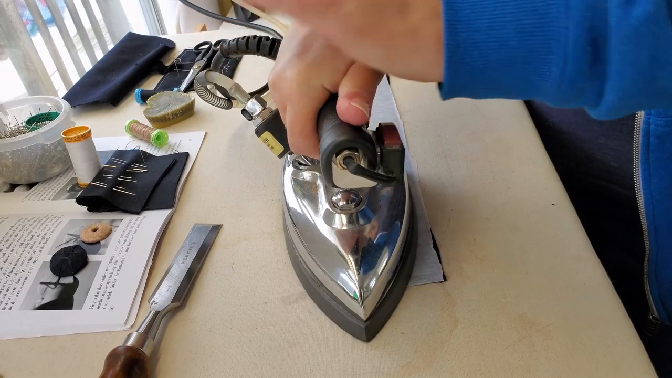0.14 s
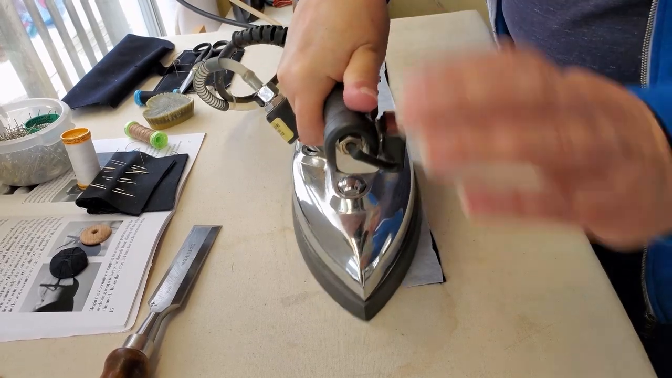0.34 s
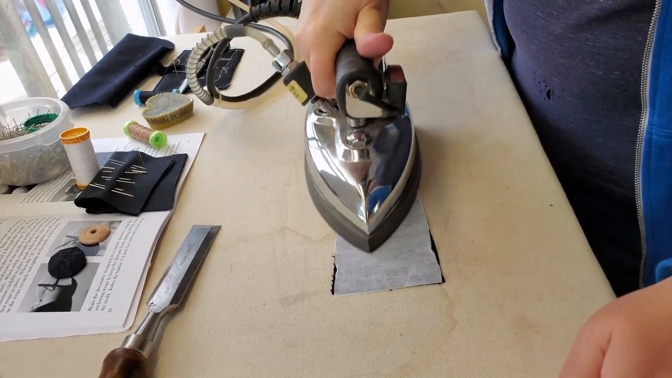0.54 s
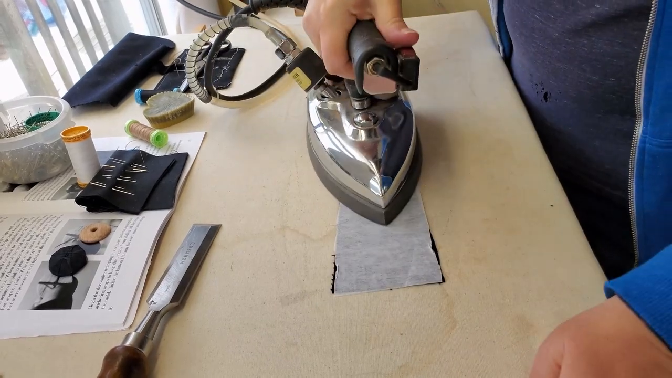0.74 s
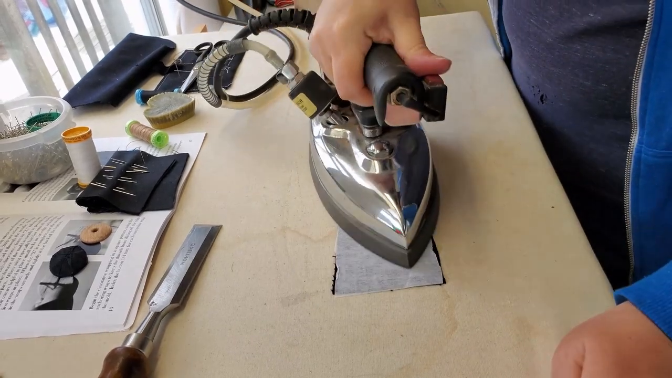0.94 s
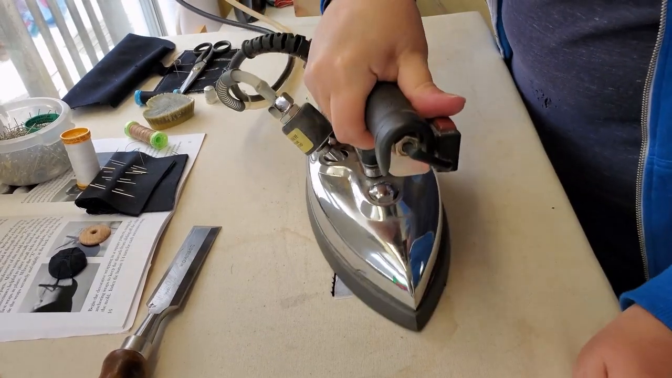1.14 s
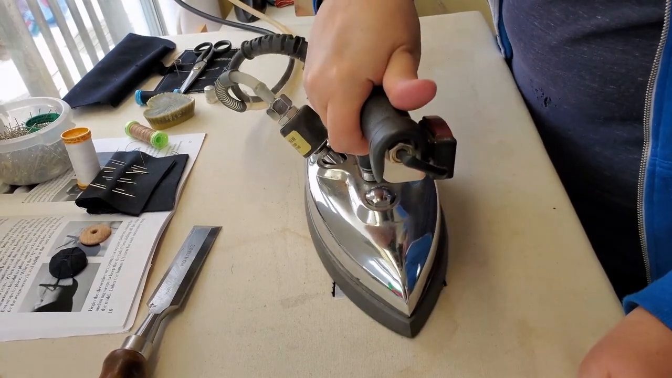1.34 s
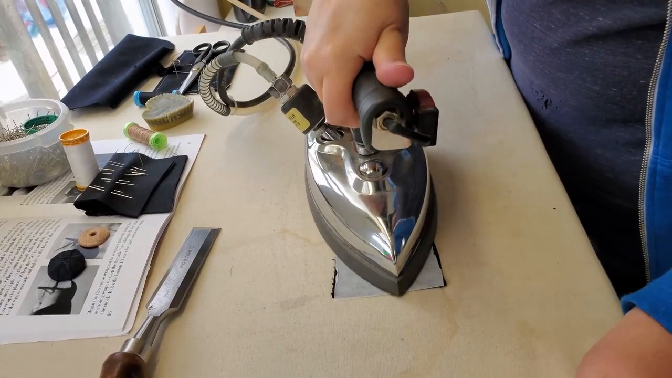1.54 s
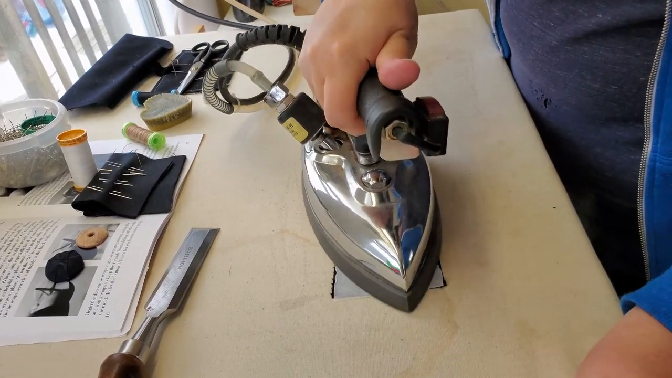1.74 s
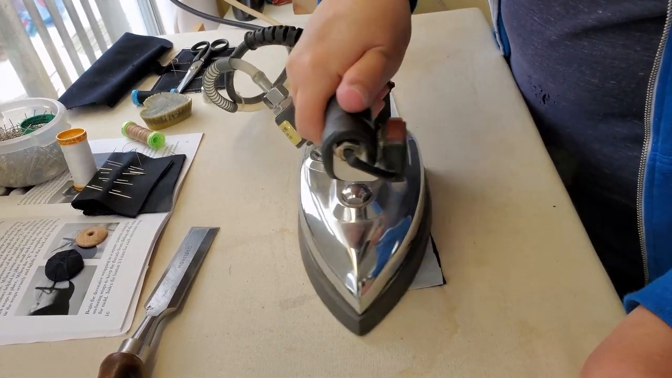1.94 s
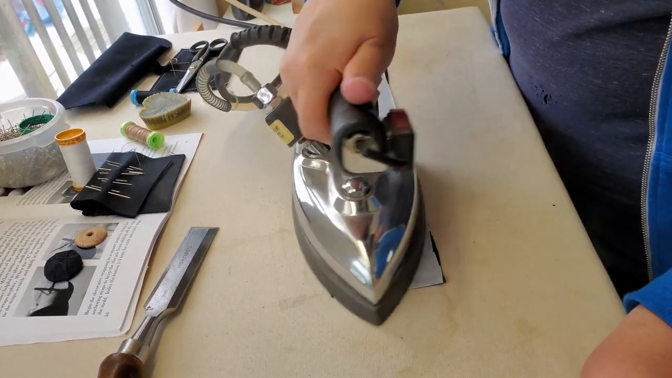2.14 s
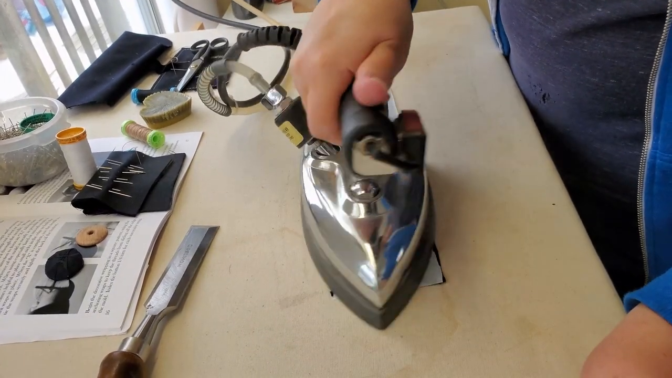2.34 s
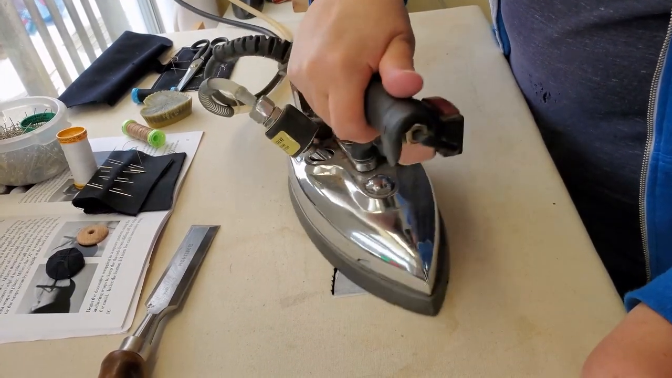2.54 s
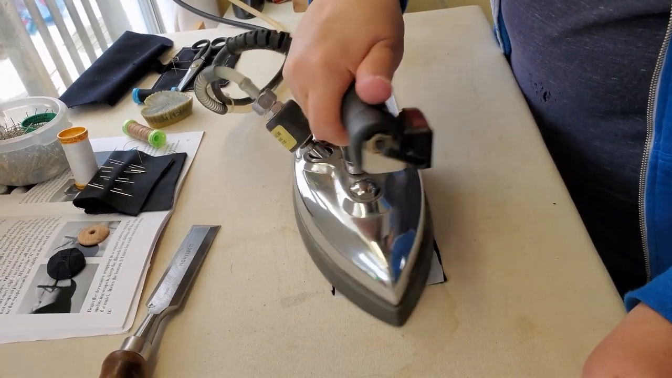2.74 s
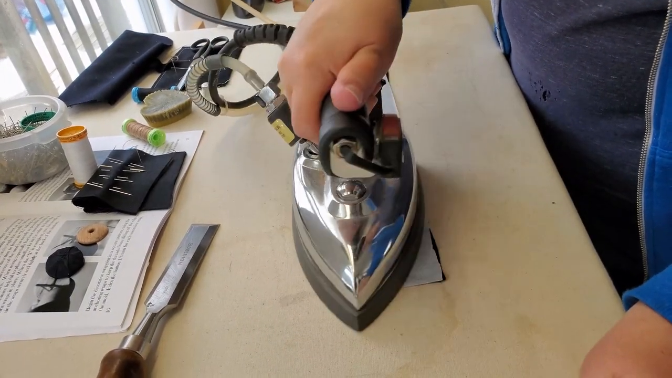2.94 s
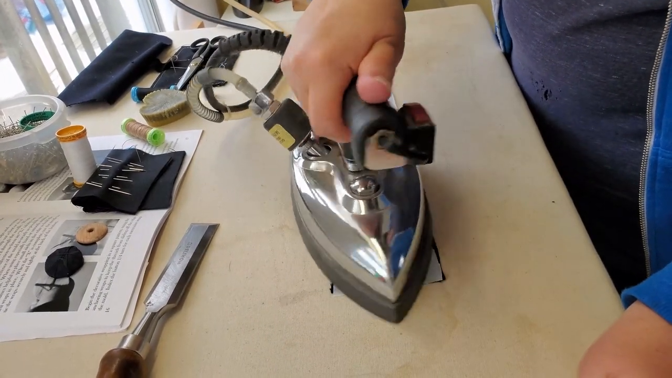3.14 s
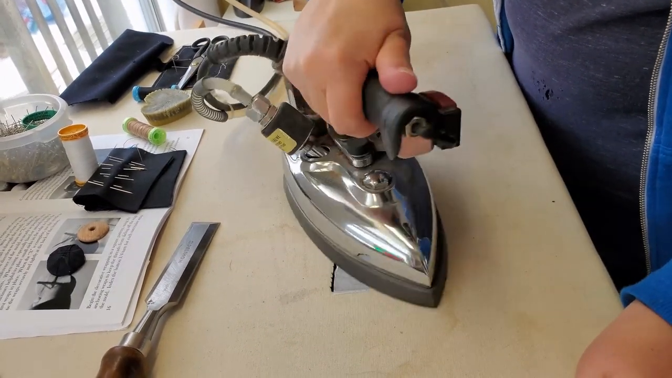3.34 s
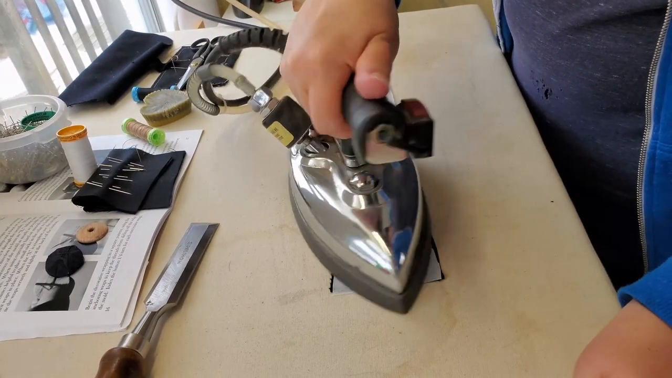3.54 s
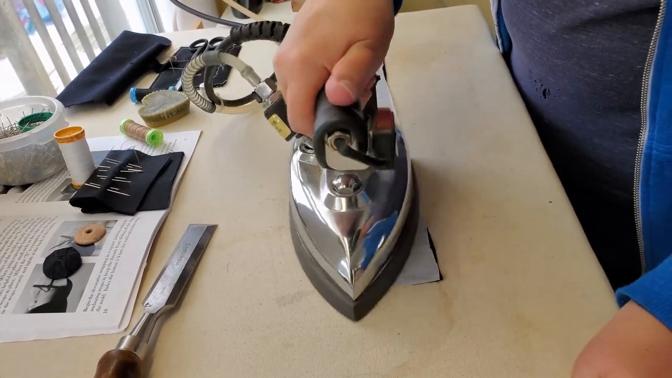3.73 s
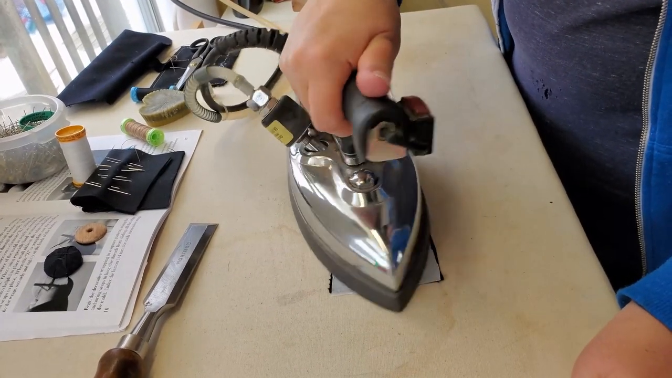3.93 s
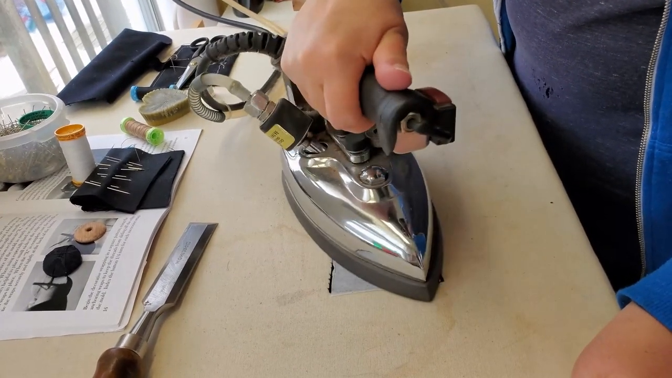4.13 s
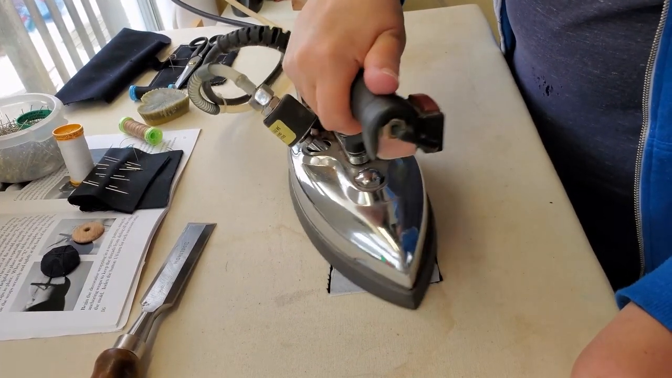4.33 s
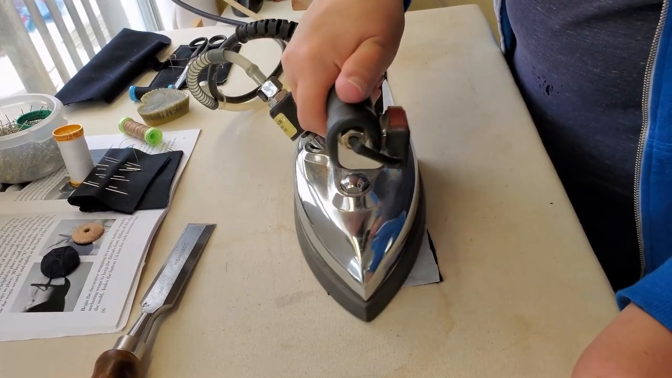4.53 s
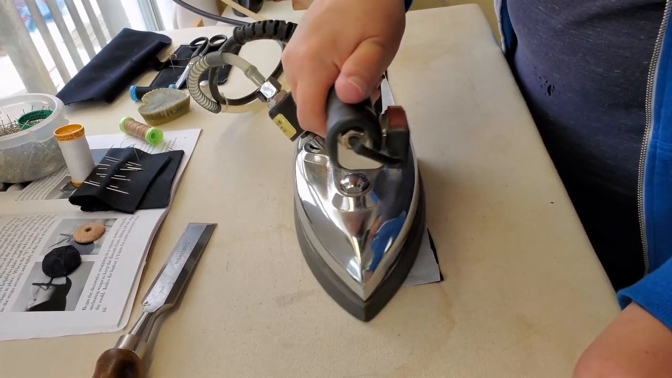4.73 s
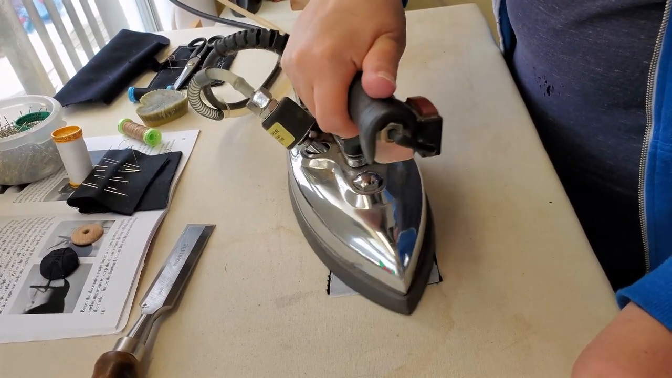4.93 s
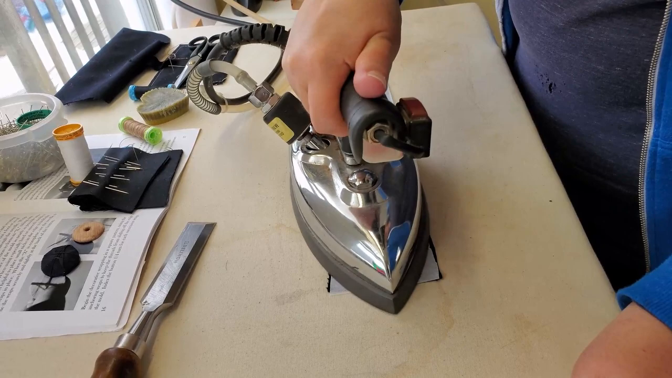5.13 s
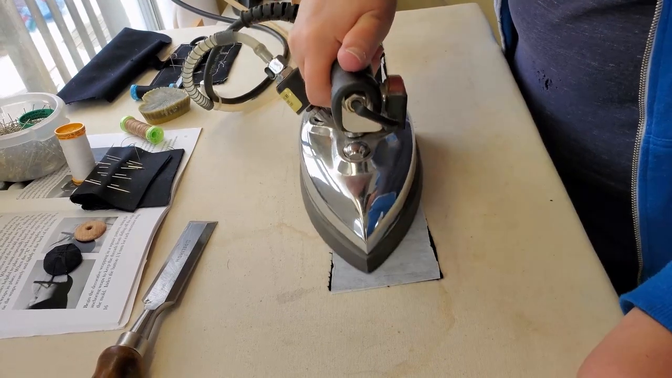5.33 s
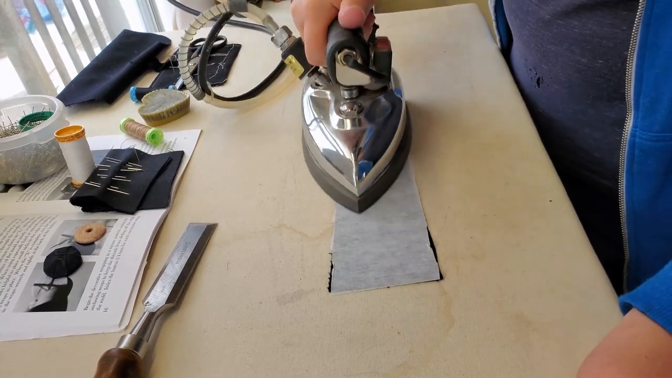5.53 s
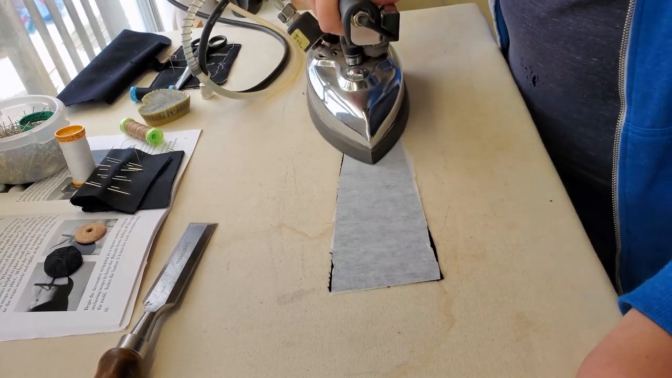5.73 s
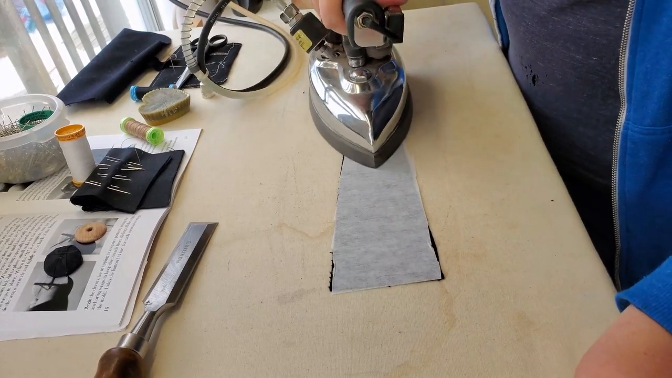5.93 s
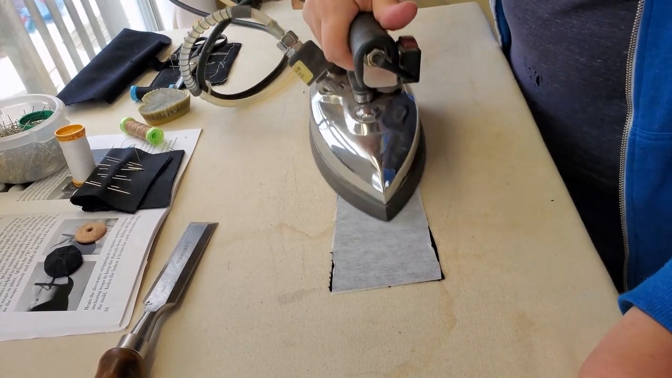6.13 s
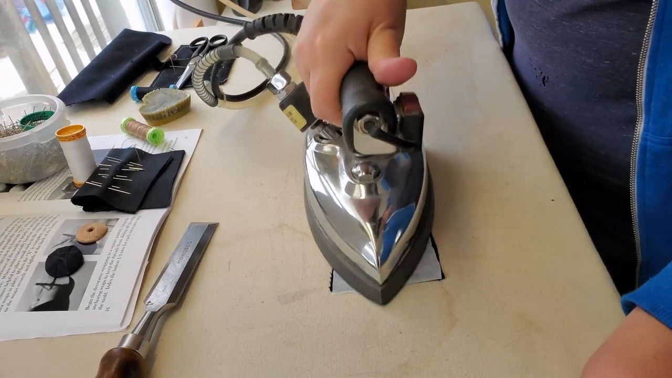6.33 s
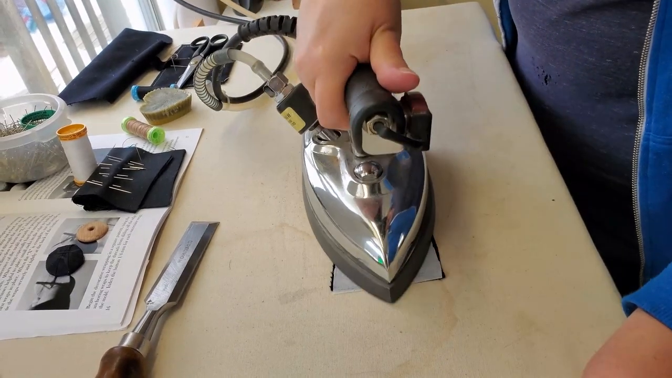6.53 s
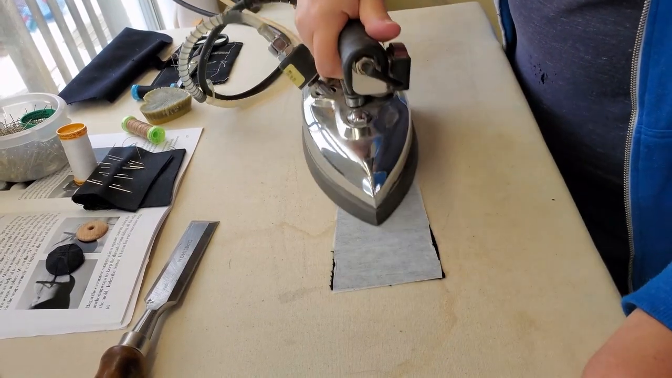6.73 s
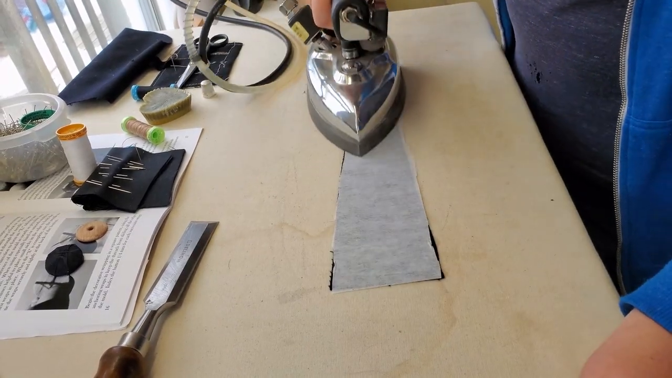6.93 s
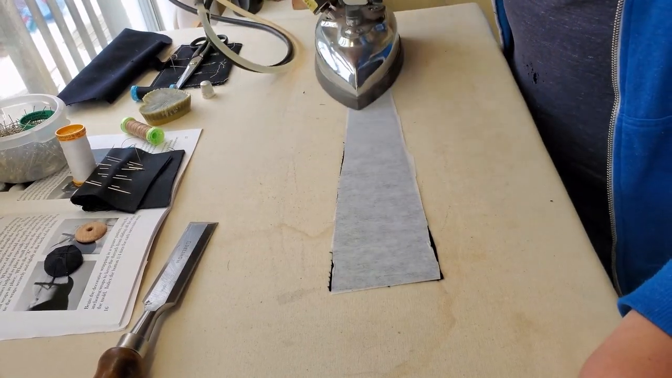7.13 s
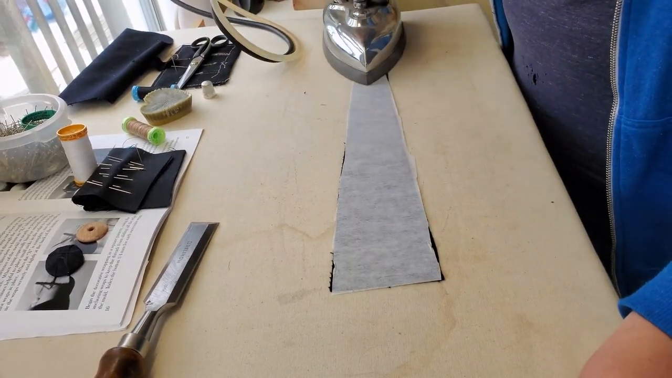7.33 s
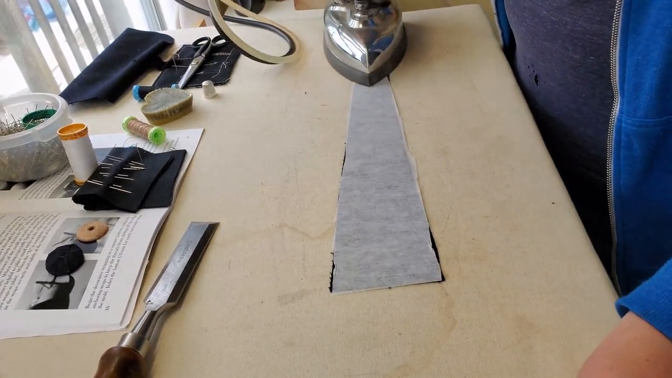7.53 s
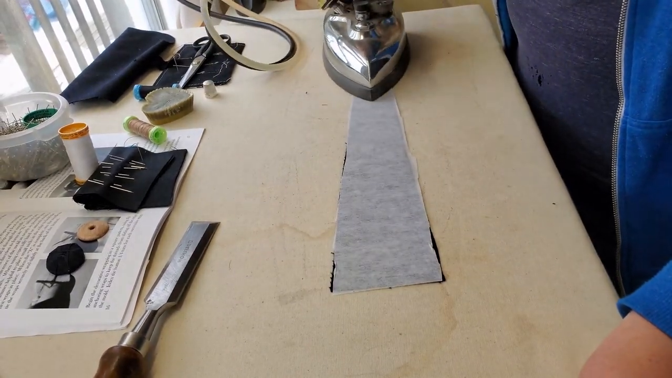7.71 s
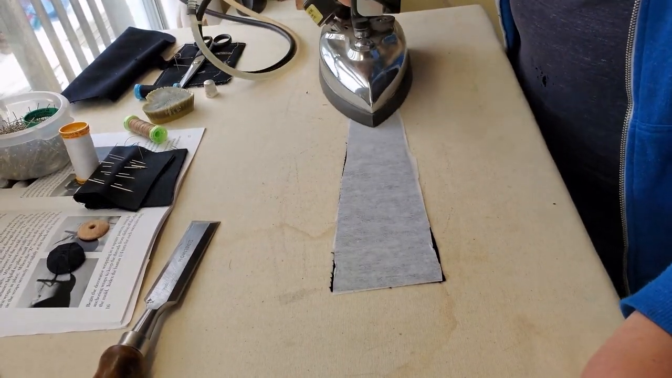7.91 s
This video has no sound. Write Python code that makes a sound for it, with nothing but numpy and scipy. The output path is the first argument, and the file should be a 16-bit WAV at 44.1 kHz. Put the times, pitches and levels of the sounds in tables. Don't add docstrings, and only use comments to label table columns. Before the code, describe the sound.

Soft cloth rustling and dull table rumble under a steel iron, heard very close. One bright, chattering click comes near the start, then catching, ticking drags and a faint squeak. About a dozen even, hushed pressing strokes follow. After a soft set-down, two further hard metallic clacks ring briefly with a short room tail, among light slides, faint steam-like singing and a last tap.

```python
import sys
import numpy as np
from scipy import signal
from scipy.fft import rfft, irfft, next_fast_len
from scipy.io import wavfile
from scipy.ndimage import map_coordinates

SR = 44100
rng = np.random.default_rng(int(sys.argv[2]) if len(sys.argv) > 2 else 0)


def invert_db(level):
    return 10 ** (np.asarray(level, dtype=float) / 20)


def file_out(sig):
    cols = np.atleast_2d(sig).T
    lim = np.clip(cols, -1, 1)
    pcm = np.round(lim * 32767).astype(np.int16)
    wavfile.write(sys.argv[1], SR, pcm)


N = 355775
TIME = np.arange(N) / SR

PORT_LAG = 10.5
IN_STEP_HZ = 3000
STEADY_TOP_HZ, TOP_HZ = 15830, 17000
BACK_S = 0.13
# (frequency [Hz], left minus right [dB])
PORT_LEAN = [(60, 0.5), (110, -0.5), (200, -0.5), (380, -4.5), (700, 3), (1290, -5.5), (2380, -5.5),
             (4400, -1.5), (8120, 1), (15000, 9)]
# (frequency [Hz], width [Hz], level [dB])
SHELL_LOW = [(850, 14, -12.5), (926, 37, 0)]
# (frequency [Hz], density [dB per Hz])
GRIT = [(350, -72), (600, -19), (875, -6.5), (1190, -5.5), (2070, 3), (2430, -11.5), (4900, -10.5),
        (15000, -24.5)]
# (time [s], rub [dB], rub of the pull back [dB])
STROKES = [(2.457, -63.5, -69), (2.74, -65, -67), (3.009, -63, -66), (3.264, -62, -64.5),
           (3.523, -60.5, -62.5), (3.788, -60.5, -65), (4.049, -61, -66.5), (4.299, -64.5, -71),
           (4.551, -66, -70.5), (4.81, -67, -69), (5.055, -67, -87)]


def unit(x):
    return x / np.sqrt(np.mean(x ** 2) + 1e-20)


def along(points, hz):
    f, v = np.transpose(points)
    return np.interp(np.log(hz + 1), np.log(f + 1), v)


def curves(rows, off=None):
    s, *cols = np.transpose(rows)
    return [np.interp(TIME, s, c, off, off) for c in cols]


def wobble(rate):
    return map_coordinates(rng.standard_normal(int(N * rate / SR) + 4), [np.arange(N) * rate / SR])


def held(rows, rise_s, fall_s):
    s, length, *cols = np.transpose(rows)[..., None]
    age = TIME - s
    edge = np.clip(np.minimum(age / rise_s, 1 + (length - age) / fall_s), 0, 1)
    return np.sin(np.pi / 2 * edge) ** 2, *cols


def total(x):
    return np.sum(x, axis=0)


def filtered(x, response):
    m = next_fast_len(x.shape[-1] + 8192)
    return irfft(rfft(x, m) * response(np.fft.rfftfreq(m, 1 / SR)), m)[..., :x.shape[-1]]


def shape(points):
    return lambda hz: invert_db(along(points, hz))


def below(hz, top_hz):
    return np.clip((top_hz - hz) / 150, 0, 1)


def modes(resonances):
    def response(f):
        return sum((-1) ** k * invert_db(db) * 1j * f * w / (c * c - f * f + 1j * f * w + 1e-9)
                   for k, (c, w, db) in enumerate(resonances))
    return response


def rush(colour, grit_db=0.):
    # (frequency [Hz], likeness of the two ports [0-1])
    alike = [(60, 1), (130, 0.53), (290, 0.75), (640, 0.4), (1400, 0.5), (3100, 0.17), (6800, 0.23),
             (10000, 0.89), (15000, 1)]
    pair = rng.standard_normal((2, N)) * invert_db(grit_db * wobble(300))

    def ports(hz):
        turn = np.arccos(np.clip(along(alike, hz), 0, 1)) / 2
        lead = np.minimum(2 * np.pi * hz * PORT_LAG / SR, 4 * np.pi)
        side = invert_db(along(PORT_LEAN, hz) / 2) * np.exp(.5j * lead)
        left = [np.cos(turn) * side, np.sin(turn) * side]
        right = [np.cos(turn) / side, -np.sin(turn) / side]
        return colour(hz) * np.array([left, right])
    return unit(filtered(pair, ports).sum(axis=1))


def glide(rows):
    hz, db = curves(rows)[0], curves(rows, off=-200)[1]
    gain = invert_db(db + 1.3 * wobble(29.2))
    return np.sqrt(2) * gain * np.sin(2 * np.pi * np.cumsum(hz) / SR)


def snaps():
    # (time [s], left peak [dB], right peak [dB])
    snap_contacts = [
        [(.8592, -27.5, -35.5), (.8601, -2, -18.5), (.8611, -5.5, -18), (.8621, -16, -6), (.8640, -11, -12.5),
         (.8652, -18, -9), (.8690, -23.5, -16.5), (.8730, -24.5, -17)],
        [(5.8331, -6.5, -20.5), (5.8341, -3, -19.5), (5.8352, -10.5, -14), (5.8370, -14.5, -17),
         (5.8381, -10, -9.5), (5.8401, -10, -7.5), (5.8440, -18.5, -14.5)],
        [(7.3163, -9.5, -27.5), (7.3171, -5, -19.5), (7.3182, -5, -19.5), (7.3192, -17.5, -7),
         (7.3212, -14.5, -10), (7.3222, -13.5, -18), (7.3243, -13, -11.5), (7.330, -25.5, -11)],
    ]
    # (frequency [Hz], density [dB per Hz])
    crack_colours = [
        [(290, -70.5), (500, -34.5), (911, -15), (1640, -20.5), (2040, -12.5), (2450, -29), (2940, -15),
         (4050, -17), (6760, -5.5), (7400, -14.5), (8800, -9.5), (10100, -14.5), (11000, -6.5), (13200, -9.5),
         (15800, -14.5), (16200, -45.5)],
        [(290, -69), (500, -36), (924, -16.5), (1660, -24.5), (2040, -11), (2400, -29.5), (2890, -12.5),
         (4230, -19), (5270, -15), (7600, -12), (8750, -15), (10800, -6), (15600, -14), (16500, -31)],
        [(290, -67.5), (500, -27), (1130, -20), (1790, -18.5), (2040, -0.5), (2290, -19), (2610, -13.5),
         (3600, -13), (4290, -14.5), (5190, -13), (6700, -4.5), (7300, -15), (8200, -7.5), (12000, -5),
         (15600, -11.5), (16500, -35)],
    ]
    # (ringing left minus right [dB], right lag [samples])
    places = [(0, 3), (0, 7), (0, 3)]
    ring_db = [-21.5, -23.5, -26.5]
    # (frequency [Hz], left minus right [dB])
    snap_lean = [(400, 3), (1650, -9.5), (2400, -8.5), (3300, -1), (6300, -6.5), (8500, 6), (12000, -0.5),
                 (15000, -3)]
    out, body = np.zeros((2, N + 2 * SR)), np.zeros(N + SR)
    t = np.arange(SR // 2) / SR
    for k, (contacts, colour, (pan_db, lag)) in enumerate(zip(snap_contacts, crack_colours, places)):
        start = contacts[0][0]
        age = t - (np.array(contacts)[:, :1] - start)
        peak_db = np.transpose(contacts)[1:, :, None]
        attack = 1 - np.exp(-np.abs(age) / 0.00057)
        blows = np.sum((age >= 0) * invert_db(peak_db - 60 * np.abs(age) / 0.016) * attack, axis=1)
        crack = invert_db(-7.0) * unit(filtered(rng.standard_normal((3, len(t))), shape(colour)))
        late = np.pad(crack[0], (max(round(lag), 0), 0))[:len(t)]
        direct = blows * (np.array([crack[0], late]) + .5 * crack[1:])
        near = filtered(direct, lambda hz: 1 / (1 - 1j * 1790 / (hz + 1)))
        near = near + invert_db(ring_db[k]) * ringing(k, t, lag) * invert_db(np.array([[pan_db], [-pan_db]]) / 2)

        def far_colour(hz):
            return shape(colour)(hz) ** 0.2 * below(hz, STEADY_TOP_HZ) / (1 + (900 / (hz + 1)) ** 2)
        far = invert_db(-5.5) * filtered(room(crack[0] * blows.mean(axis=0)), far_colour)
        thud = unit(filtered(rng.standard_normal(len(t)), modes([(391.3, 360, 0)])))
        at = round(start * SR)
        body[at:at + len(t)] = thud * invert_db(-58.5 - 60 * t / 0.41)
        out[:, at:at + len(t)] += near
        out[:, at:at + far.shape[1]] += far

    def bright(hz):
        lean = invert_db(along(snap_lean, hz) * [[.5], [-.5]])
        return below(hz, TOP_HZ) / (1 - 1j * 650 / (hz + 1)) ** 2 * lean
    return invert_db(0.04) * filtered(out[:, :N], bright) + filtered(body[:N], lambda hz: below(hz, TOP_HZ))


def ringing(k, t, lag):
    main_hz = [872, 935, 1148, 2061, 2216, 2600, 3182, 5335, 5932, 6445, 6905, 9352, 10500, 1470]
    bright_hz = [5094, 7400, 8098, 8900, 11100, 12340, 13550]
    further_hz = [2900, 3620, 6750, 7700, 14600, 15400, 730]
    # (t60 [s], first snap [dB], second snap [dB], third snap [dB])
    mode_rings = [(0.58, -23, -30.5, -27), (0.41, -17, -17, -18.5), (0.44, -26, -19, -11.5),
                  (0.39, -5.5, -2, -4.5), (0.19, -21, -8.5, -24), (0.33, -28, -10, -6.5),
                  (0.27, -23.5, -23, -11.5), (.14, -9, -2.5, 1), (0.36, -30, -24.5, -16.5),
                  (.18, -10, -5, -9), (.11, 0.5, -11, -3.5), (0.22, -16.5, -14, -17), (0.11, -8, -7, 1),
                  (0.23, -25, -16.5, -32.5),
                  (.16, -11, -11, -18.5), (.12, -18.5, -9, -28), (0.19, -12, -6, -11),
                   (.18, -10.5, -26.5, -11), (0.15, -8, -9, -2.5), (0.075, -6, -6.5, -7.5),
                   (.14, -8, -8.5, -5.5),
                  (.14, -12.5, -6.5, -14), (.07, -14, -2.5, -11), (.08, -5.5, -3.5, -5.5),
                 (.12, -14.5, -10, -14), (.08, -7, -4.5, -3), (.09, -10, -2.5, -6.5), (.2, -24, -30, -23.5)]
    lasts = [0.87, 0.81, 0.83]
    curb = [261, 300, 36]
    rough_hz = 6000
    rings = mode_rings
    count = len(rings)
    phases = rng.uniform(0, 2 * np.pi, (count, 1, 1)) + rng.normal(0, 0.33, (count, 2, 1))
    knots = np.meshgrid(np.arange(count), t * 110, indexing='ij')
    drifts = map_coordinates(rng.standard_normal((count, 64)), knots)
    tone = np.zeros((2, len(t)))
    for hz, row, phase, drift in zip(main_hz + bright_hz + further_hz, rings, phases, drifts):
        swell = 1 - np.exp(-t / 0.013 * (hz / 2000) ** .7)
        fade = invert_db(row[1 + k] - 60 * t / (row[0] * lasts[k])) * invert_db(-curb[k] * t ** 2)
        arrival = t - lag / SR * (hz < IN_STEP_HZ) * np.array([[0], [1]])
        blur = hz / rough_hz * (.2 + 1.0 * (hz > rough_hz)) * drift
        tone += swell * fade * np.sin(2 * np.pi * hz * arrival + phase + blur)
    return tone


def room(x):
    # (frequency [Hz], t60 [s])
    decay = [(500, 0.42), (2000, 0.28), (4500, 0.23), (8000, 0.18), (15000, 0.18)]
    share = .7
    hz, t, z = signal.stft(rng.standard_normal((2, SR // 2)), SR, nperseg=256)
    tail = signal.istft(z * invert_db(-60 * t / along(decay, hz)[:, None]), SR, nperseg=256)[1]
    tail = np.array([tail[0], share * tail[0] + np.sqrt(1 - share ** 2) * tail[1]])
    return signal.fftconvolve(np.pad(x, (260, 0))[None], tail / np.linalg.norm(tail[0]), axes=1)


def rubbing():
    # (start [s], length [s], cloth rub [dB], fine hiss above it [dB], dull scuff above it [dB])
    slides = [(0, 0.49, -71.5, -9, -6), (.36, 0.38, -64, -10, -10), (1.25, 0.029, -67.5, -3, 1),
              (1.36, 0.346, -81.5, -4, 7.5), (1.72, 0.31, -66, -9, -5), (2.05, 0.214, -70, -7, -1.5),
              (5.2, 0.042, -66, -28.5, -23), (5.26, 0.61, -67, -6, -23), (5.96, 0.16, -83.5, 6.5, -23.5),
              (6.12, 0.31, -70, -1.5, -22), (6.43, 0.43, -72, -7.5, -9), (6.92, 0.44, -66.5, -6, -26.5),
              (7.6, 0.05, -59.5, -22.5, -12), (7.68, 0.38, -66, -9, -28.5)]
    # (start [s], length [s], scuff [dB])
    set_down = [
        (5.2, 0.052, -70),
        (5.262, 0.023, -63.5),
        (5.3, 0.067, -73),
    ]
    # (frequency [Hz], density [dB per Hz])
    cloth = [(260, -33), (450, -9), (502, -25), (832, -4.5), (1170, -8.5), (1350, 0), (1960, 3.5),
             (2850, -0.5), (3150, -3), (4080, -7.5), (4600, -9), (5190, -4), (5990, -22), (6600, -6.5),
             (8000, -22), (10400, -45.5), (17600, -120)]
    fine = [(3820, -23.5), (6500, 2.5), (7430, -6.5), (10600, -5), (12100, -7.5), (15100, -6), (15800, -13)]
    slide, rub_db, hiss_db, scuff_db = held(slides, 0.034, 0.077)
    strokes = []
    for s, push_db, back_db in STROKES:
        strokes += [(s, push_db, -8), (s + BACK_S, back_db, -10)]
    s, stroke_db, fine_db = np.transpose(strokes)[..., None]

    def speed(width_s):
        return np.exp(-.5 * np.abs((TIME - s) / width_s) ** 3.2)
    rub = total(invert_db(rub_db) * slide) + total(invert_db(stroke_db) * speed(.046))
    hiss = total(invert_db(rub_db + hiss_db) * slide) + total(invert_db(stroke_db + fine_db) * speed(.044))
    bump, bump_db = held(set_down, 0.0043, 0.0396)
    dull = total(invert_db(rub_db + scuff_db) * slide) + total(invert_db(bump_db) * bump)
    scuff = dull * rush(modes([(360, 93, -2.0), (825, 300, -0.5), (1700, 500, -3)]), grit_db=0.5)
    return rub * rush(shape(cloth), grit_db=0.4) + hiss * rush(shape(fine), grit_db=0.9) + scuff


def dragging():
    # (start [s], length [s], low mode [dB], high modes at the start [dB])
    drags = [
        (0, 0.26, -73.5, -85),
        (0.41, 0.43, -67.5, -66),
        (1.695, 0.426, -64, -56),
    ]
    # (time [s], level [dB])
    slips = [(0.059, -56), (0.101, -59), (0.201, -65), (.495, -53.5), (.567, -57), (0.65, -53),
             (.698, -57.5), (1.9658, -62), (1.9854, -62), (2.0133, -54.5), (2.0421, -55), (2.0700, -54.5),
             (2.1047, -51), (2.1443, -50.5), (2.186, -52.5)]
    # (time [s], level [dB])
    chatter = [(1.6976, -55), (1.7088, -56), (1.7218, -82), (1.7453, -61), (1.7801, -64.5), (1.792, -66),
               (1.8231, -57), (1.842, -49.5), (1.8833, -48.5), (1.9065, -52), (1.9348, -48.5),
               (1.9662, -56)]
    # (frequency [Hz], width [Hz], level [dB])
    shell = [(1428, 18, -5), (1540, 40, -8), (2093, 16, -5.5), (3180, 22, -3), (3400, 90, -7.5),
             (3820, 59, -6.5), (4220, 90, -8), (4820, 150, -5), (5400, 45, -2), (6600, 64, -1.5),
             (7300, 65, -5.5), (8180, 100, -14.5), (9160, 100, -14), (10800, 200, -12)]
    sole = [(2120, 15, 2), (2600, 30, -8.5), (3000, 36, -8), (3744, 100.3, -13.5), (7800, 40, -14.5)]
    # (frequency [Hz], density [dB per Hz])
    tick = [(2500, -30), (4000, 0), (6600, 1), (8200, -15), (10500, -3.5), (15000, -13.5)]
    # (time [s], pitch [Hz], level [dB])
    squeaks = [
        [(1.76, 1870, -77), (1.79, 1880, -66), (1.84, 1880, -60.5), (1.88, 1877, -80)],
        [(4.03, 2160, -80), (4.07, 2050, -69), (4.12, 1950, -75)],
        [(7.612, 3750, -63.5), (7.69, 3760, -99)],
    ]
    drag, low_db, high_db = held(drags, 0.062, 0.088)
    since = np.clip(TIME - np.array(drags)[:, :1], 0, 1)
    low = total(invert_db(low_db) * drag)
    high = total(invert_db(high_db - 24.5 * since) * drag)
    s, db = np.transpose(slips + [(s, db - 6) for s, db in chatter])[..., None]
    age = TIME - s
    catch = total((age > 0) * invert_db(db - 5.5 - 60 * np.abs(age) / 0.099))
    edge = total((age > 0) * invert_db(db - 9 - 60 * np.abs(age) / .04))

    def scrape(hz):
        metal = (modes(shell)(hz) + modes(sole)(hz)) / (1 + (hz / 12000) ** 4)
        return metal + invert_db(-14.0) * shape(GRIT)(hz)
    out = low * rush(modes(SHELL_LOW)) + (invert_db(-2.5) * high + catch) * rush(scrape, grit_db=-0.5)
    out = out + edge * rush(shape(tick), grit_db=1.0) + sum(glide(rows) for rows in squeaks)
    kicks = np.bincount(np.round(s[:, 0] * SR).astype(int), invert_db(db[:, 0] + 27), N)
    struck = filtered(kicks, modes(shell + sole))
    return out + np.array([struck * invert_db(-4.0), np.roll(struck, round(PORT_LAG))])


def stop():
    # (frequency [Hz], level [dB], t60 [s])
    knock = [(1432, -7.5, 0.19), (2040, -2, .076), (2770, -4.5, 0.14), (4904, -7, 0.11), (5432, -9, .06),
             (5679, -12, .1)]
    age = np.clip(TIME - 2.1855, 0, 1)
    ring = sum(invert_db(-47 + db - 60 * age / t60) * np.sin(2 * np.pi * hz * age) for hz, db, t60 in knock)
    ring = ring * (1 - np.exp(-age / 0.0009))
    return np.array([ring * invert_db(-9.5), np.roll(ring, round(PORT_LAG))])


def steam_singing():
    # (start [s],
    # length [s], level [dB])
    leaks = [
        [(1.42, 0.27, -73.5), (1.7, 0.17, -71.5), (1.88, 0.13, -68.5), (6.27, 0.1, -71), (6.45, 0.11, -71.5),
         (6.64, 0.19, -74.5), (7.9, 0.15, -76)],
        [(6.11, 0.25, -78.5), (7.78, 0.27, -84)],
        [(1.48, 0.49, -77.5), (6.1, 0.6, -87), (6.8, 0.35, -84), (7.78, .3, -89)],
        [(1.475, 0.28, -75.5)],
        [(5.28, 0.099, -74), (6.38, 0.067, -77.5), (6.55, 0.21, -78.5)],
        [(6.424, .22, -77)],
        [(6.12, .2, -84.5)],
        [(5.18, 0.058, -64), (6.92, .06, -78)],
        [(1.7, .12, -83.5), (1.85, 0.37, -66)],
        [(1.718, 0.39, -73.5)],
    ]
    # (frequency [Hz], width [Hz])
    gap_modes = [(5932, 13.2), (9060, 66), (13670, 86), (5000, 130), (1540, 27), (815, 190), (2590, 40),
                 (2033, 260), (2140, 30.2), (3320, 44.7)]
    steam = rush(np.ones_like)
    out = np.zeros((2, N))
    for rows, (hz, width) in zip(leaks, gap_modes):
        leak, db = held(rows, .07, .08)
        out = out + total(invert_db(db) * leak) * invert_db(1.32 * wobble(3.57)) * whistle(steam, hz, width)
    return out


def whistle(steam, hz, width):
    noise = unit(filtered(steam, modes([(hz, width, 0)])))
    if width > 50:
        return noise
    tone = np.sqrt(2) * np.sin(2 * np.pi * np.cumsum(hz + 0.384 * width * wobble(49)) / SR)
    late = np.roll(tone, round(PORT_LAG / 2) * (hz < IN_STEP_HZ))
    side = invert_db(along(PORT_LEAN, hz) / 2 * np.array([[1], [-1]]))
    return unit(invert_db(8) * noise + side * [tone, late])


def taps():
    # (time [s], bright [dB], dull above it [dB], low mode above it [dB], dull pitch [Hz])
    contacts = [(0.0138, -60, -27.5, -5, 157), (0.057, -61, -29, -8, 231), (0.1001, -60, -21, -4, 290),
                (0.4026, -45, -29, -6.5, 149), (1.2702, -53.5, -0.5, -35, 293),
                (1.3038, -64, -20, -12, 269), (1.683, -61.5, -1.5, -29, 520), (1.6886, -59.5, 0.5, 1, 161),
                (2.1855, -44, -25, -6.5, 203.4), (5.204, -64, 2.5, -30.5, 295),
                (5.265, -61.5, 0, -29.5, 403), (6.133, -54, -27, -42.5, 158),
                (7.6111, -46.5, -14.5, -41, 277.4), (7.642, -49.5, -18, -19, 301)]
    grit, tones = np.zeros(N + SR), np.zeros(N + SR)
    t = np.arange(SR // 2) / SR
    for s, db, dull_db, mode_db, hz in contacts:
        at = round(s * SR)
        grit[at:][:len(t)] += invert_db(db - 5.0 - 60 * t / 0.087) * (1 - np.exp(-t / 0.0015))
        push = invert_db(db + dull_db - 60 * t / 0.14) * (1 - np.exp(-t / 0.0019))
        ring = invert_db(db + mode_db - 60 * t / 0.3) * (1 - np.exp(-t / 0.0013))
        tones[at:][:len(t)] += push * np.sin(2 * np.pi * hz * t)
        tones[at:][:len(t)] += ring * np.sin(2 * np.pi * SHELL_LOW[1][0] * t)
    return grit[:N] * rush(shape(GRIT), grit_db=2.0) + tones[:N] * invert_db([[-1.2], [1.2]])


def table_shaking():
    # (start [s], length [s], rumble [dB], board tone above it [dB])
    shoves = [(0, 0.81, -66.5, -11), (.63, 0.031, -55.5, -10.5), (.8, 0.093, -62.5, -6.5),
              (1.25, 0.097, -75, 2.5), (1.45, 0.54, -70.5, -11.5), (2.62, 0.24, -67.5, -14),
              (2.9, 0.26, -62, -13.5), (3.2, 0.27, -69, -5), (3.52, 0.15, -63, -9.5),
              (3.8, 0.41, -62, -9.5), (4.3, 0.24, -73, -15), (4.58, 0.17, -66, -14),
              (4.85, 0.19, -64, -10.5), (5.19, 0.042, -68, 4.5), (5.75, 0.18, -66, -19),
              (6, 0.23, -74.5, -29), (6.85, 0.24, -68.5, -11), (7.05, 0.1, -80, -19),
              (7.3, 0.17, -67.5, -7.5), (7.61, 0.022, -67, -5)]
    # (frequency [Hz], density [dB per Hz])
    rumble = [(12, -48), (20, -15.5), (30, -10), (47, 1), (65, 6.5), (83, 4), (130, -23), (170, -41.5),
              (290, -120)]
    board_colour = [(65, -25), (110, -3.5), (140, -4), (319, -18), (378, -22.5), (430, -22), (600, -24),
                    (780, -58), (1320, -120)]
    # (time [s], level [dB])
    flexing = [(0, -91), (.5, -68), (.9, -67), (1.2, -74.5), (1.7, -76.5), (2.1, -69.5), (2.45, -77.5),
               (2.6, -89)]
    # (time [s], pitch [Hz], level [dB])
    bounces = [
        [(5.2, 79.3, -71), (5.222, 75, -53), (5.258, 67, -54), (5.275, 67.8, -74)],
        [(7.315, 75, -74), (7.335, 68, -50), (7.355, 62, -64), (7.375, 60, -66)],
        [(7.612, 71.6, -70), (7.63, 70, -55.5), (7.65, 67.4, -58), (7.7, 66, -71)],
    ]
    # (time [s], pitch [Hz], level [dB])
    groan = [(0.4, 149, -80), (0.444, 143.6, -60), (0.49, 162, -67.5), (0.55, 166, -58), (.595, 165, -70),
             (.64, 167.3, -57.5), (0.744, 164, -59.5), (0.8, 163.5, -72)]
    shove, low_db, board_db = held(shoves, 0.038, 0.13)
    low = invert_db(-79) + total(invert_db(low_db) * shove)
    board = invert_db(-84.5) + total(invert_db(low_db + board_db) * shove)
    shake = low * invert_db(2 * wobble(15)) * rush(shape(rumble))
    shake = shake + board * invert_db(2.5 * wobble(20)) * rush(shape(board_colour))
    flex = invert_db(curves(flexing)[0] + 2.2 * wobble(13.0)) * rush(lambda hz: modes([(94, 16, 0)])(hz) ** 2)
    octave = np.array(groan) * [1, 2, 1] + [0, 0, -21]
    return shake + flex + sum(glide(rows) for rows in bounces) + glide(groan) + glide(octave)


def air():
    # (frequency [Hz], density [dB per Hz])
    colour = [(12, -33), (20, -15.5), (74, -5.5), (123, -18), (181, -8.5), (539, -25.5), (843, -18),
              (1210, -18.5), (1400, -14.5), (1540, -6), (1700, -11.5), (2570, -13), (3100, -20),
              (3910, -20.5), (6650, -20), (7650, -30), (13700, -25.5), (15800, -31)]
    # (frequency [Hz], rms [dB])
    mains = [(60, -77)]
    # (start [s], length [s], level [dB], more in the airy band [dB])
    hushes = [(0, 1, -1, -4), (1.02, 0.22, 0.5, 4), (1.33, 0.36, -1, -5), (1.7, .35, -6.5, -2.5),
              (2.5, 2.6, 0.5, 0.5), (6.46, 0.28, -0.5, -15), (6.65, .17, -3, 8), (6.88, 0.59, 5, 0.5),
              (7.44, 0.13, -7, 1), (7.75, 0.36, -1, 5)]
    # (low [Hz], high [Hz])
    airy_hz = (7400, 13000)
    hum = 0
    for hz, db in mains:
        hum = hum + invert_db(db + 1.5 * wobble(2.6)) * np.sqrt(2) * np.sin(2 * np.pi * hz * TIME)
    tone = invert_db(-68.5 + 0.61 * wobble(2.2)) * rush(shape(colour))
    treble = filtered(tone, lambda hz: 1 / (1 + (1300 / (hz + 1)) ** 4))
    airy = filtered(tone, lambda hz: 1 / (1 + (airy_hz[0] / (hz + 1)) ** 20) / (1 + (hz / airy_hz[1]) ** 10))
    hush, db, airy_db = held(hushes, 0.023, .04)
    turns = np.array([s + way * BACK_S / 2 for s, *_ in STROKES for way in (-1, 1)])[:, None]
    turning = total(np.exp(-.5 * ((TIME - turns) / 0.017) ** 2))
    gain = invert_db(-0.5 + total(db * hush) - 2.5 * turning)
    return tone + (gain - 1) * treble + gain * (invert_db(total(airy_db * hush)) - 1) * airy + hum


def scene():
    # (frequency [Hz], width [Hz], depth [0-1])
    port_dips = [(4650, 260, 0.2), (7450, 370, 0)]
    quiet = rubbing() + dragging() + stop() + steam_singing() + taps() + table_shaking() + air()

    def ports(hz):
        dips = [1 - np.clip(deep, 0, 1) * np.exp(-((hz - c) / w) ** 2) for c, w, deep in port_dips]
        return np.prod(dips, axis=0) * (hz < STEADY_TOP_HZ)
    return snaps() + filtered(quiet, ports)


def band_limit(x):
    return signal.sosfilt(signal.butter(12, 17160, fs=SR, output="sos"), x)


def record(dry):
    return band_limit(dry)


dry = scene()
out = record(dry)
file_out(out)
```